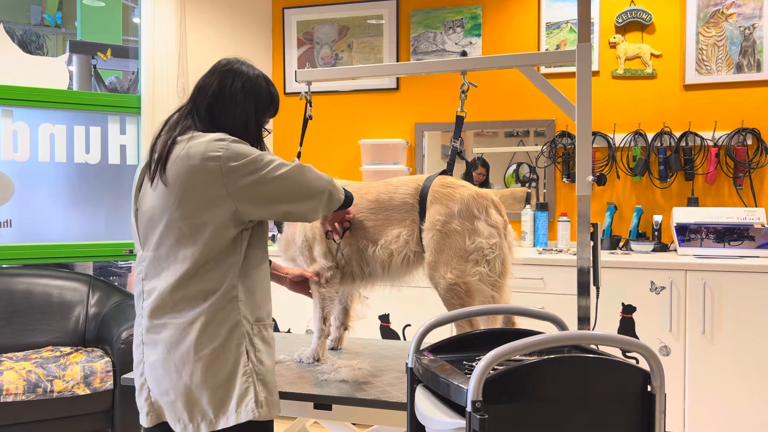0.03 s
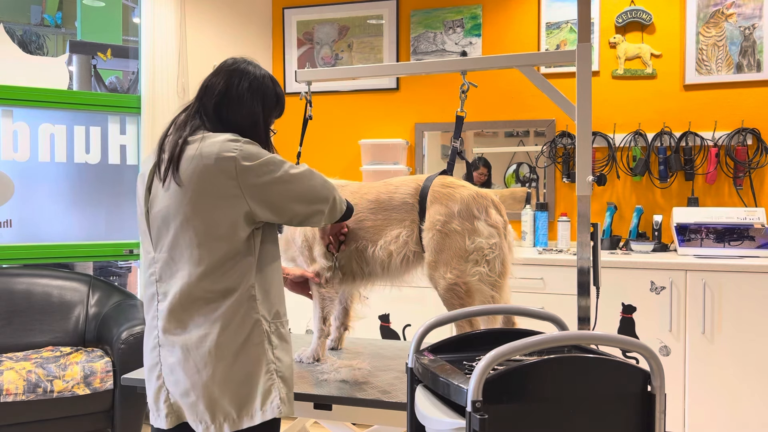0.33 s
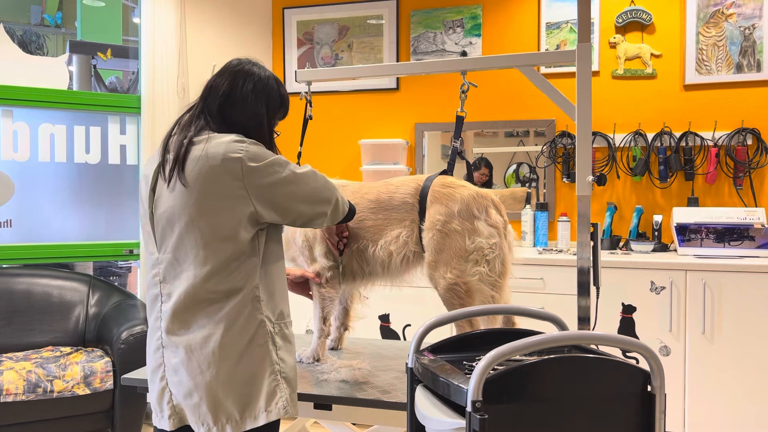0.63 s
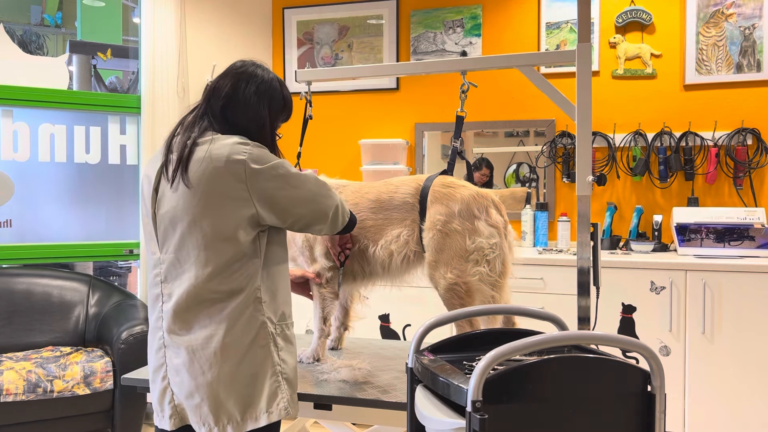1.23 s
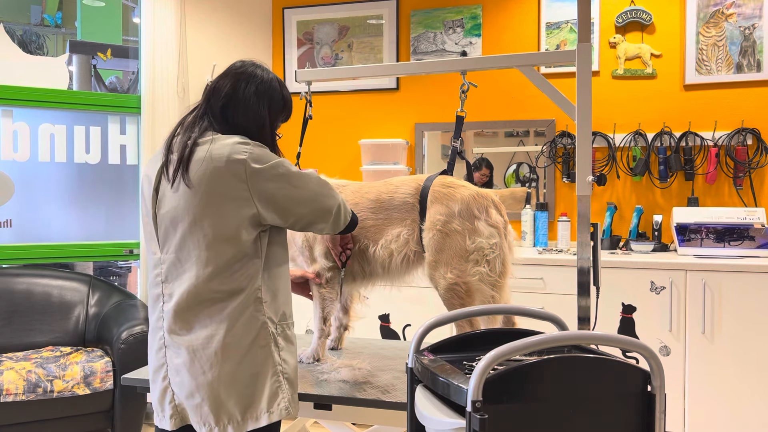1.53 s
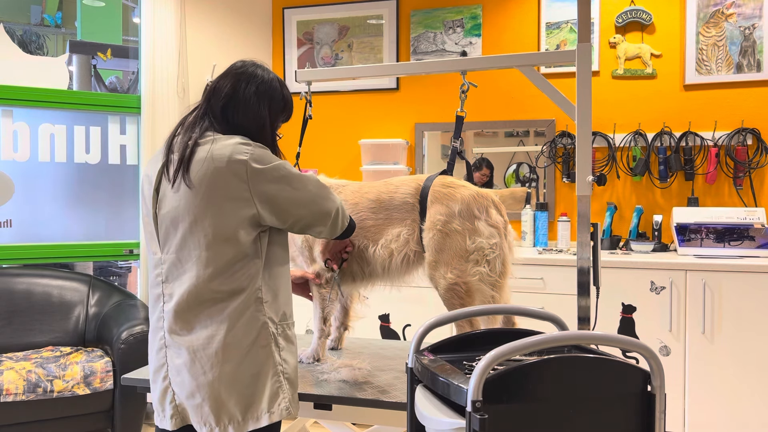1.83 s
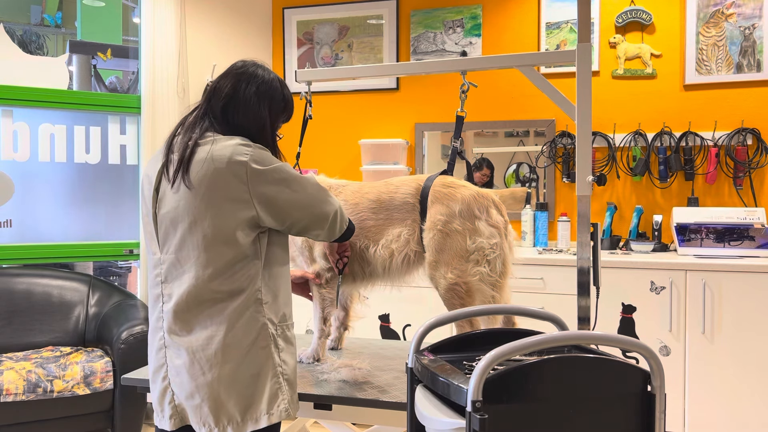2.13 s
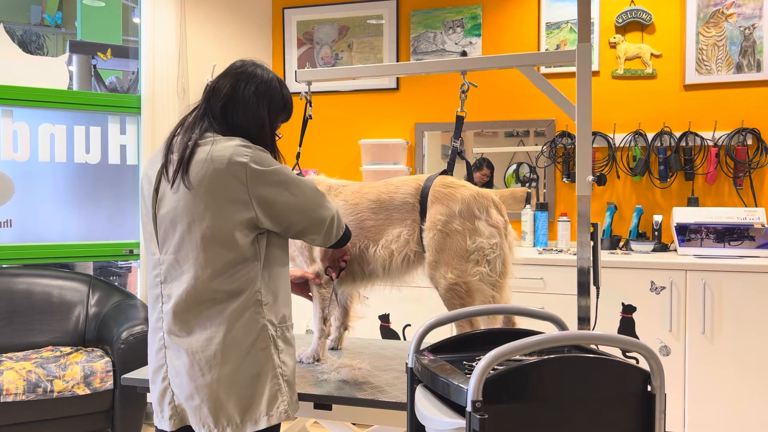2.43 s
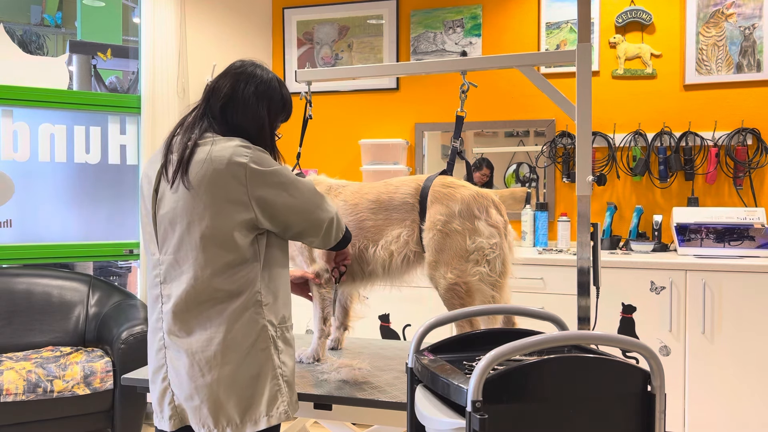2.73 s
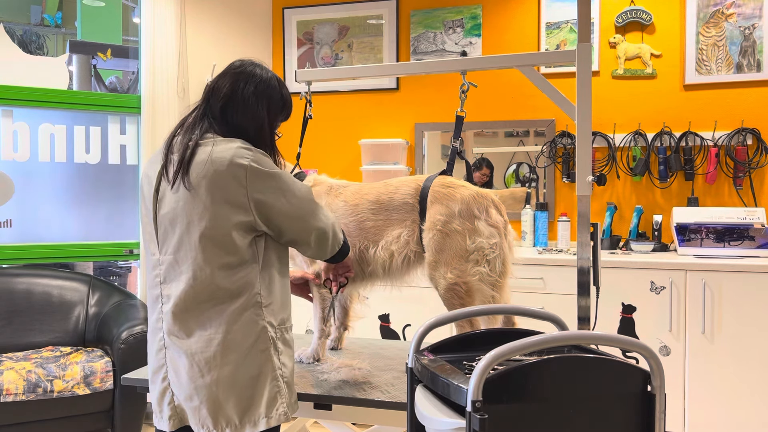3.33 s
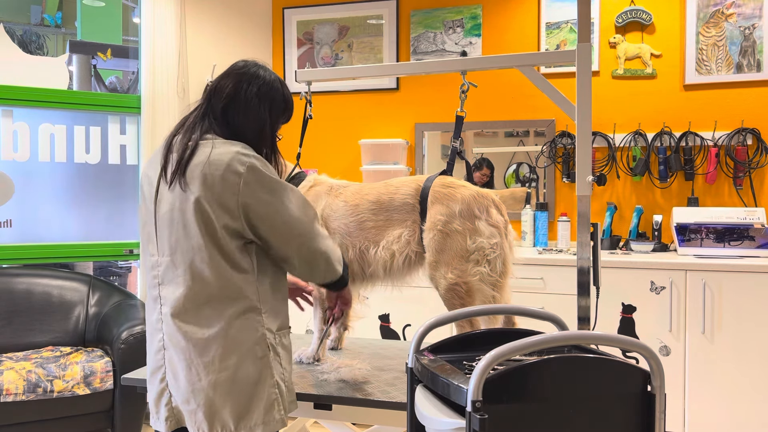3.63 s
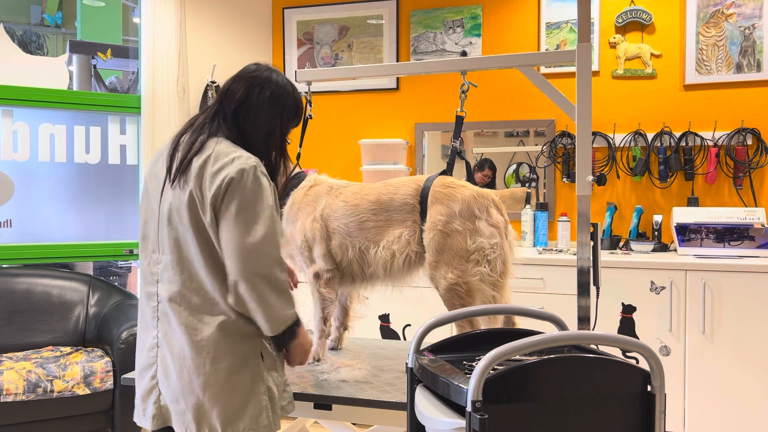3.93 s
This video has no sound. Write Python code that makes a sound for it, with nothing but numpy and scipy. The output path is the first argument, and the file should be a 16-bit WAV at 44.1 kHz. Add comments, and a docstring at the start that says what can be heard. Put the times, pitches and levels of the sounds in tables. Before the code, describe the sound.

Scissors snip six times through a dog's coat over a low ventilation drone.

```python
"""A small, hard-walled grooming salon: scissors snip six times through a dog's coat.
Each cut is a light slide of the blades, a swelling shear through hair and the clack of the handles
meeting; between cuts the blades scrape open with a squeak. A smock rustles as the arm moves,
over the low drone of ventilation."""
import sys
import numpy as np
from scipy import signal
from scipy.fft import rfft, irfft
from scipy.io import wavfile

SR = 44100
rng = np.random.default_rng(int(sys.argv[2]) if len(sys.argv) > 2 else 0)


def master_out(mix):
    """Clip the mix to full scale and print it as 16-bit PCM to the path in sys.argv[1]."""
    frames = np.transpose(np.atleast_2d(mix))
    ceiling = np.clip(frames, -1, 1)
    pcm = np.round(ceiling * 32767).astype(np.int16)
    wavfile.write(sys.argv[1], SR, pcm)


N = 176400
BAND_EDGE_HZ = 15950

# Coherence of the diffuse field. Each row: frequency in Hz, left-right correlation.
COHERENCE = [(50, 1), (120, 1), (200, 0.76), (320, 0.75), (600, 0.2), (1500, 0.14), (3200, 0.31),
             (8000, 0.34), (15000, 0.02)]


def cuts():
    """The shear swells as the blades close, ending in a steel clack and the knock of the handles."""
    # Each row: shutting time in seconds, clack in dB, treble shelf in dB, knock in Hz, knock in dB,
    # shear length in seconds, shear peak in dB.
    snips = [(0.5967, -39, -1.5, 2140, -35.5, 0.018, -52.5),
             (1.4037, -25.5, -5.5, 2730, -24.5, 0.0088, -40.5),
             (2.0579, -38.5, -6, 2170, -35.5, 0.013, -55.5), (2.5946, -36, -6.5, 2280, -33.5, 0.013, -54),
             (3.1006, -46.5, -15, 2090, -37.5, 0.032, -64), (3.5, -53, -1.5, 1994, -30.5, 0.009, -49)]
    # Spectra of sheared hair and steel contact. Each row: frequency in Hz, relative density in dB.
    shear_colour = [(300, -17), (1200, -19.5), (2500, -14), (5500, -11.5), (7200, -7.5), (7900, -3),
                    (8500, -3.5), (9200, -4.5), (10300, -40.5), (11200, -4.5), (12200, 1.5), (12800, -18),
                    (14000, -9), (15200, 4.5), (16200, -8.5)]
    clack_colour = [(200, -20.5), (700, -16), (1000, -22.5), (1600, -12), (2400, -6), (3350, -10.5),
                    (4100, -10.5), (5000, -4.5), (5800, -6), (7000, -9.5), (8000, 1), (9100, -4),
                    (10300, -16.5), (11300, -7), (12200, -5.5), (12800, -7.5), (13700, -10), (15300, -4)]
    swell_db, release_s = 23.5, .005
    rattle_db, rattle_fade_s, knock_fade_s = .5, .00078, .00019
    bounce_s, bounce_db = .0012, -1.5
    steel, knocks = np.zeros((2, N))
    after = np.arange(SR // 100) / SR
    for shut_s, clack_db, treble_db, knock_hz, knock_db, shear_s, shear_db in snips:
        t = np.arange(-shear_s, .02, 1 / SR)
        swell = np.where(t < 0, amp(-swell_db * (t / shear_s) ** 2), np.exp(-abs(t) / release_s))
        shear = amp(shear_db) * swell * grit(len(t))
        add(steel, shut_s - shear_s, coloured(shear, shear_colour, treble_db))
        rattle = rng.standard_normal(len(after)) * np.sqrt(after) * np.exp(-after / rattle_fade_s)
        contact = signal.unit_impulse(len(after)) + amp(rattle_db) * rattle / np.linalg.norm(rattle)
        add(contact, bounce_s, amp([bounce_db]))
        add(steel, shut_s, coloured(amp(clack_db) * contact, clack_colour, treble_db))
        knock = np.diff(np.sin(2 * np.pi * knock_hz * after) * after * np.exp(-after / knock_fade_s))
        add(knocks, shut_s, amp(knock_db) * knock / np.linalg.norm(knock))
    return blade_ring(steel, ring_db=-13)[:N] + knocks


def slides():
    """Blade glides on blade with little hair between; one mode sings."""
    # Each row: start in seconds, length in seconds, level in dB, treble shelf in dB, mode in Hz,
    # mode level in dB.
    glides = [(0.513, 0.069, -71, -11, 5390, -77), (.535, 0.14, -67.5, -11, 1460, -78),
              (1.107, .03, -63.5, 3, 5500, -81), (1.15, 0.028, -62.5, 9, 5370, -81),
              (1.177, 0.024, -77, 2, 5500, -93), (1.277, 0.0054, -66, -2, 3890, -92),
              (1.306, .036, -79.5, 2.5, 8300, -82), (1.378, 0.012, -56.5, -3.5, 3290, -74.5),
              (1.986, 0.023, -77, -10, 8040, -76.5), (1.999, 0.056, -73, 8.5, 3840, -82.5),
              (2.524, 0.056, -74, -5, 3900, -83.5), (3.049, 0.05, -74, -26, 3790, -77),
              (3.438, 0.024, -74, 6, 3830, -82.5), (3.4725, 0.012, -61.5, 14, 3730, -76.5)]
    # Friction spectrum. Each row: frequency in Hz, relative density in dB.
    colour = [(500, -38.5), (2500, -18.5), (4600, -17), (5600, -20), (7200, -11.5), (7800, -2.5),
              (8400, -2.5), (9000, -10.5), (10300, -29.5), (11300, -10.5), (12100, -11), (12800, -22.5),
              (14200, -15), (15300, 7), (16200, -10.5)]
    out = np.zeros(N)
    for start_s, length_s, level_db, treble_db, mode_hz, mode_db in glides:
        count = round(length_s * SR)
        envelope = np.hanning(count) ** .5
        friction = coloured(amp(level_db) * envelope * grit(count), colour, treble_db)
        add(out, start_s, blade_ring(friction, ring_db=-9))
        add(out, start_s, amp(mode_db) * envelope * squeak(np.full(count, mode_hz)))
    return out


def openings():
    """The blades break free with a short scrape; the squeak rises as the contact point moves."""
    # Each row: start in seconds, scrape in dB, scrape fade in seconds, treble shelf in dB,
    # squeak in dB, final squeak pitch in Hz.
    releases = [(0.7332, -59, 0.0088, -3, -69.5, 4100), (.766, -57.5, 0.0061, 4, -77, 4100),
                (1.566, -56.5, 0.0069, -8, -67, 4075), (1.606, -67.5, 0.005, -3.5, -70, 4150),
                (2.2064, -58, 0.0087, 0.5, -67, 4000), (2.734, -57, 0.006, -7, -65.5, 3960),
                (3.2377, -55.5, 0.0093, -4, -66.5, 3666)]
    # Scrape spectrum. Each row: frequency in Hz, relative density in dB.
    colour = [(500, -40.5), (2000, -15.5), (3200, -6.5), (4600, -13), (6000, -5), (7300, -4.5), (7800, 0),
              (8500, -4), (9500, -24.5), (11300, -12), (12700, -3), (13600, -24), (15300, 6.5),
              (16200, -12.5)]
    rise_s, squeak_fade_s = .0032, .0099
    glide_hz, glide_s = 490, .006
    out, t = np.zeros(N), np.arange(SR // 10) / SR
    rise = np.minimum(t / rise_s, 1)
    squeak_envelope = rise * np.exp(-(t / squeak_fade_s) ** 2)
    dip_hz = glide_hz * np.exp(-t / glide_s)
    for start_s, scrape_db, fade_s, treble_db, squeak_db, squeak_hz in releases:
        scrape = amp(scrape_db) * rise * np.exp(-t / fade_s) * grit(len(t))
        add(out, start_s, blade_ring(coloured(scrape, colour, treble_db), ring_db=-7))
        add(out, start_s, amp(squeak_db) * squeak_envelope * squeak(squeak_hz - dip_hz))
    return out


def grit(count, grains_per_s=7000, spread_db=4.5):
    """Tiny slips of steel and snapping hairs: dense clicks of uneven size."""
    chance, size, sign = rng.random((count, 3)).T
    gains = amp(spread_db * np.minimum(-np.log(1 - size), 3))
    return unit_rms((chance < grains_per_s / SR) * gains * np.sign(sign - .5))


def squeak(hz, width_hz=450):
    """One blade mode driven by uneven stick-slip: a narrow, rough band around its pitch."""
    slips = rng.standard_normal((len(hz), 2)) @ [1, 1j]
    pole = np.exp(-np.pi * width_hz / SR)
    swing = signal.lfilter([1], [1, -2 * pole, pole * pole], slips)
    carrier = np.exp(2j * np.pi * np.cumsum(hz) / SR)
    return unit_rms((swing * carrier).real)


def blade_ring(x, ring_db, t60_s=.025):
    """Adds the ring of the steel blades, damped by the hand."""
    # Each row: mode frequency in Hz, relative level in dB.
    modes = [(3860, -19), (5520, -18), (7900, -12.5), (8200, -10.5), (8460, -20.5), (14950, -20.5)]
    t = np.arange(SR // 10) / SR
    response = signal.unit_impulse(len(t))
    for hz, db in modes:
        mode = amp(-60 * t / t60_s) * np.cos(2 * np.pi * hz * t)
        response += amp(db + ring_db) * mode / np.linalg.norm(mode)
    return signal.fftconvolve(x, response)


def smock(flutter_db=.94):
    """Cloth brushes on cloth as the arm arrives and leaves."""
    # Each row: time in seconds, rustle level in dB.
    movement = [(0, -59.5), (.05, -67), (.3, -79.5), (0.399, -94.5), (3.45, -94), (3.62, -71.5),
                (3.76, -74), (3.84, -69), (3.92, -70.5), (4, -71.5)]
    # Cloth spectrum. Each row: frequency in Hz, relative density in dB.
    colour = [(200, -17), (600, -2.5), (2000, 1), (3500, -1.5), (7000, -7), (9000, -12), (10300, -38),
              (11800, -16.5), (15500, -31.5)]
    rustle = noise_pair(colour, balance_db=-1.5)
    return rustle * amp(over_time(movement) + flutter_db * wander(rate_hz=180))


def ventilation(hum_hz=115.98, drift_hz=2.478, waver_db=2.5, drone_db=-43, air_db=-80.5):
    """A low drone, a wavering fan hum and faint air hiss."""
    # Spectra of drone and air. Each row: frequency in Hz, relative density in dB.
    drone_colour = [(15, -50.5), (26, -16.5), (40, 2), (60, 2), (72, -6.5), (88, -8), (100, -4.5), (116, 1),
                    (130, -3), (150, -24.5), (168, -8.5), (188, -18.5), (208, -11), (250, -25), (305, -25),
                    (400, -33), (500, -41.5), (700, -64), (1500, -87)]
    air_colour = [(290, -16), (500, -13), (613, -1), (698, -4.5), (960, -12), (1550, -17.5), (1950, -11.5),
                  (3200, -23.5), (6140, -22.5), (16000, -34.5)]
    # Each row: time in seconds, hum level in dB before the channel gains.
    hum_swell = [(0, -58), (.45, -46.5), (1.3, -52.5), (1.699, -44), (2.3, -51.5), (2.851, -43),
                 (3.099, -52), (4, -47)]
    cycles = np.cumsum(hum_hz + drift_hz * wander(rate_hz=10.06)) / SR
    tone = unit_rms(np.sin(2 * np.pi * cycles) * amp(waver_db * wander(rate_hz=6)))
    hum = amp(over_time(hum_swell)) * tone * amp([[.9], [-.9]])
    drone = amp(drone_db) * noise_pair(drone_colour, balance_db=1.8)
    air = amp(air_db) * noise_pair(air_colour, balance_db=-2)
    return drone + hum + air


def salon(x, tail_db, build_s, left_lag_s, left_db):
    """Direct sound just right of centre, near echoes, and a tail that dies faster in the treble."""
    # Each row: frequency in Hz, T60 in seconds.
    decay = [(200, .55), (1000, 0.79), (2700, 0.45), (5500, 0.42), (8000, 0.37), (11000, .34),
             (16000, 0.13)]
    # Nearby surfaces. Each row: left delay in seconds, right delay in seconds, level in dB.
    echoes = [(.0034, 0.0026, -16), (.0078, 0.0063, -5), (0.0115, .0142, -10.5), (0.023, .0198, -12.5)]
    hz, t, spectra = signal.stft(rng.standard_normal((2, SR)), SR, nperseg=256)
    spectra = diffuse_pair(*spectra, hz[:, None])
    t60_s = over_frequency(decay, hz)[:, None]
    tail = signal.istft(spectra * amp(-60 * t / t60_s), SR, nperseg=256)[1]
    tail *= 1 - np.exp(-np.arange(tail.shape[1]) / SR / build_s)
    response = amp(tail_db) * tail / np.linalg.norm(tail[0])
    for left_s, right_s, db in echoes:
        add(response[0], left_s, amp([db]))
        add(response[1], right_s, amp([db]))
    delay = np.exp(-2j * np.pi * np.fft.rfftfreq(N, 1 / SR) * left_lag_s)
    left = amp(left_db) * irfft(rfft(x) * delay, N)
    return np.array([left, x]) + signal.fftconvolve(x[None], response, axes=1)[:, :N]


def coloured(x, colour, treble_db, shelf_hz=10000, shelf_width_ln=.65, size=2048):
    """Minimum-phase filter of unit energy: a spectrum with a treble shelf and a top roll-off."""
    hz = abs(np.fft.fftfreq(size, 1 / SR))
    shelf = (1 + np.tanh(np.log((hz + 1) / shelf_hz) / shelf_width_ln)) / 2
    rolloff_db = 20 * np.clip((hz - BAND_EDGE_HZ) / 1000, 0, 2)
    log_gain = np.log(amp(over_frequency(colour, hz) + treble_db * shelf - rolloff_db))
    taps = np.fft.ifft(np.exp(np.conj(signal.hilbert(log_gain)))).real[:size // 2]
    return signal.fftconvolve(x, taps / np.linalg.norm(taps))


def noise_pair(colour, balance_db):
    """Steady coloured stereo noise of rms 1; positive balance is left."""
    hz = np.fft.rfftfreq(N, 1 / SR)
    spectra = diffuse_pair(*rfft(rng.standard_normal((2, N))), hz)
    pair = irfft(spectra * amp(over_frequency(colour, hz)), N)
    return unit_rms(pair * amp([[balance_db / 2], [-balance_db / 2]]))


def diffuse_pair(a, b, hz):
    """Mixes two independent spectra into left and right, alike in the bass."""
    coherence = over_frequency(COHERENCE, hz)
    return np.array([a, coherence * a + np.sqrt(1 - coherence ** 2) * b])


def wander(rate_hz):
    """Low-passed random motion of rms 1."""
    hz = np.fft.rfftfreq(N, 1 / SR)
    return unit_rms(irfft(rfft(rng.standard_normal(N)) * np.exp(-(hz / rate_hz) ** 2), N))


def over_frequency(points, hz):
    """Interpolates a table on a log-frequency axis."""
    points_hz, values = np.transpose(points)
    return np.interp(np.log(hz + 1), np.log(points_hz + 1), values)


def over_time(points):
    """Interpolates a table at every sample."""
    return np.interp(np.arange(N) / SR, *np.transpose(points))


def amp(db):
    """Decibels to gain."""
    return 10 ** (np.asarray(db) / 20)


def unit_rms(x):
    """Scales to rms 1."""
    return x / np.sqrt(np.mean(x ** 2) + 1e-20)


def add(mix, start_s, sound):
    """Mixes a sound in, in place."""
    part = mix[max(round(start_s * SR), 0):][:len(sound)]
    part += sound[:len(part)]


def scene():
    """Scissors in the room, with cloth and ventilation."""
    scissors = cuts() + slides() + openings()
    in_room = salon(scissors, tail_db=-2, build_s=.012, left_lag_s=.000012, left_db=-1.2)
    return in_room + smock() + ventilation()


def record(dry):
    """Soft ends and a low-pass at the band edge."""
    fade_s = .004
    t = np.arange(N) / SR
    ends = np.sin(np.pi / 2 * np.minimum(np.minimum(t, t[::-1]) / fade_s, 1))
    lowpass = signal.firwin(511, BAND_EDGE_HZ, window=("kaiser", 9), fs=SR)
    return signal.oaconvolve(dry * ends, lowpass[None], "same")


dry = scene()
out = record(dry)
master_out(out)
```